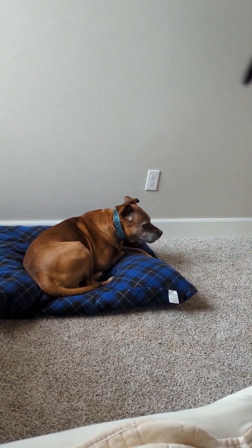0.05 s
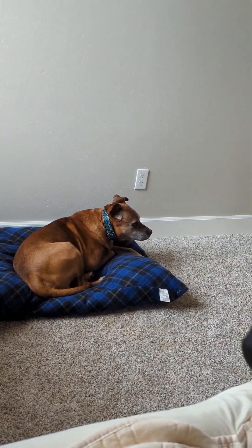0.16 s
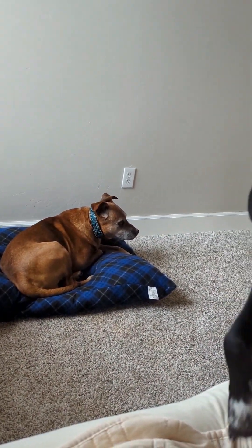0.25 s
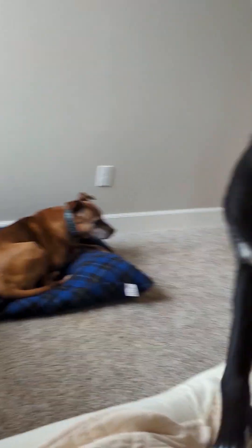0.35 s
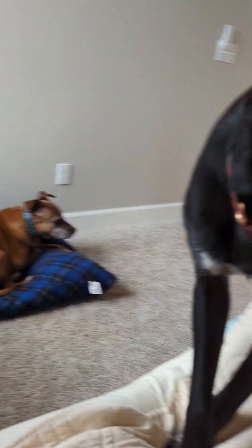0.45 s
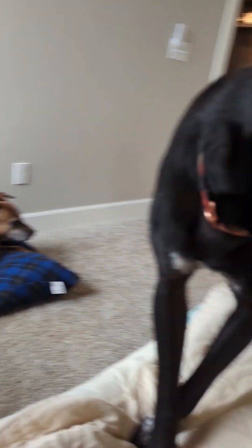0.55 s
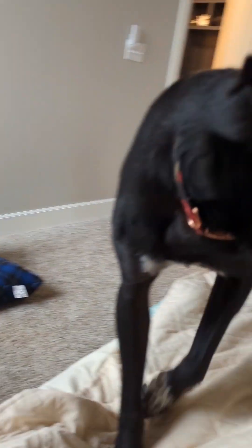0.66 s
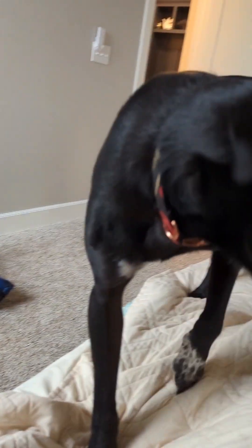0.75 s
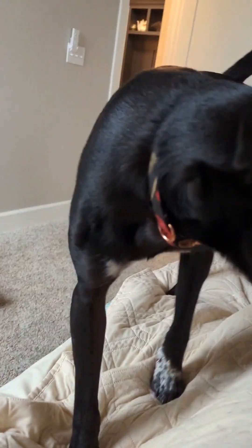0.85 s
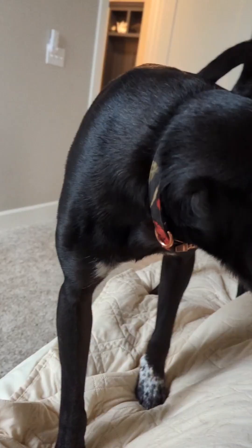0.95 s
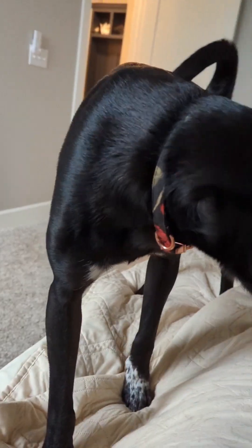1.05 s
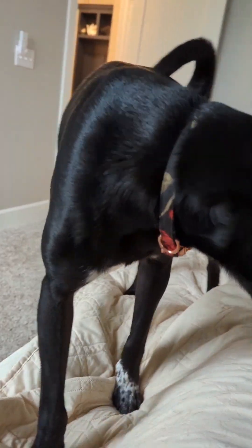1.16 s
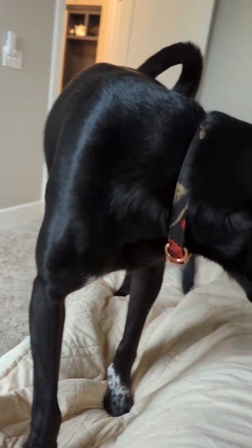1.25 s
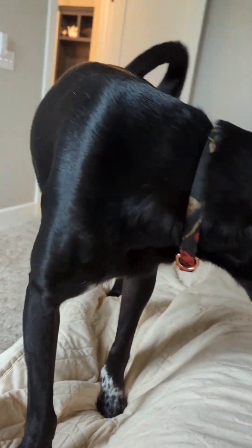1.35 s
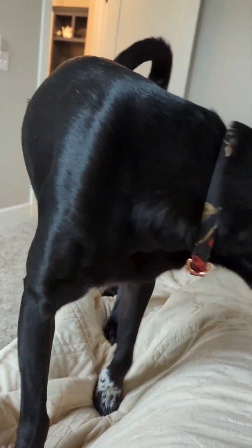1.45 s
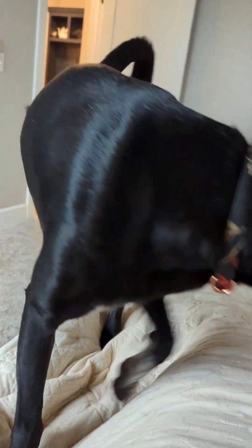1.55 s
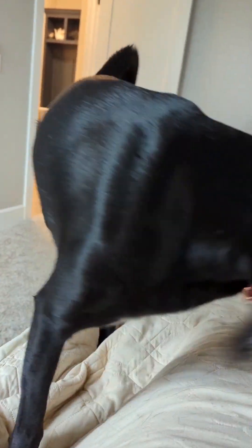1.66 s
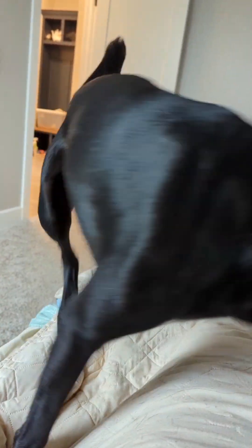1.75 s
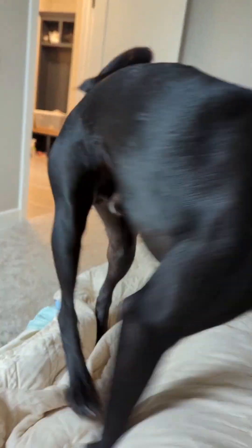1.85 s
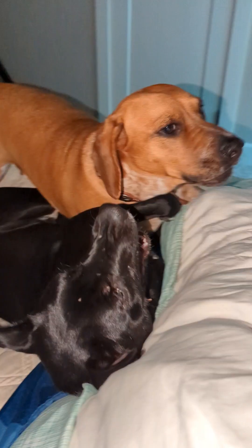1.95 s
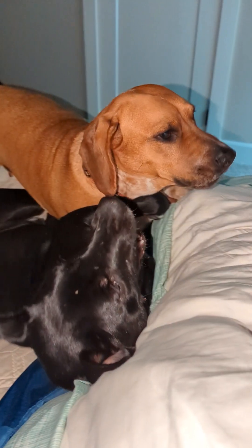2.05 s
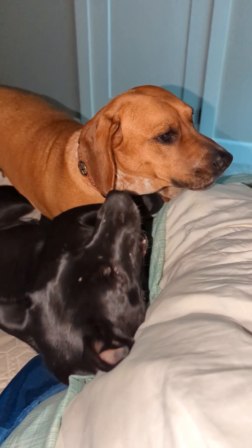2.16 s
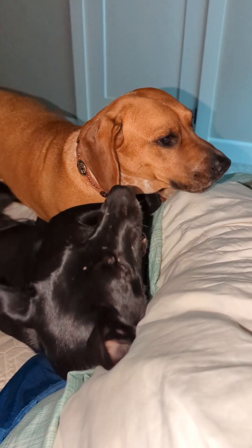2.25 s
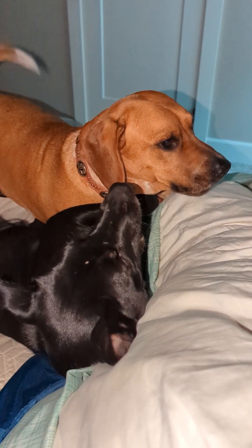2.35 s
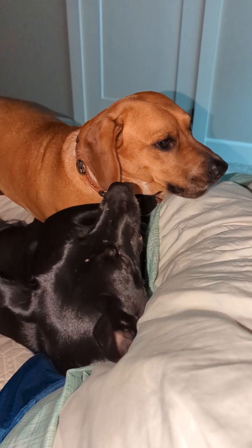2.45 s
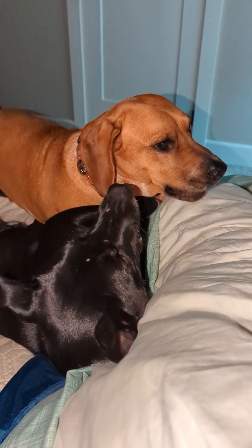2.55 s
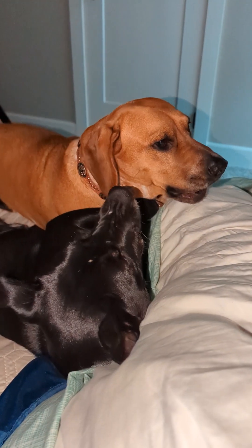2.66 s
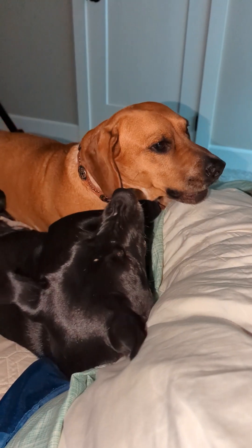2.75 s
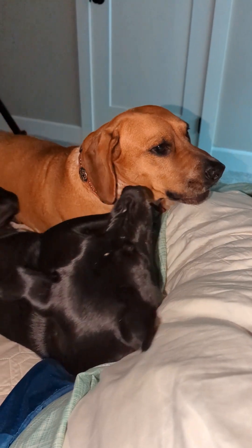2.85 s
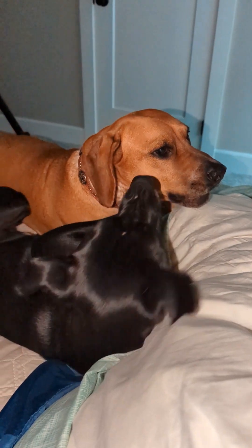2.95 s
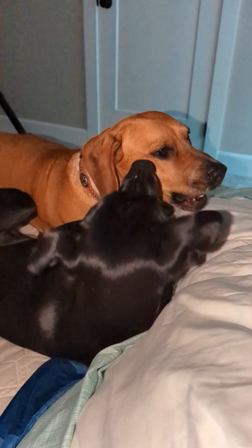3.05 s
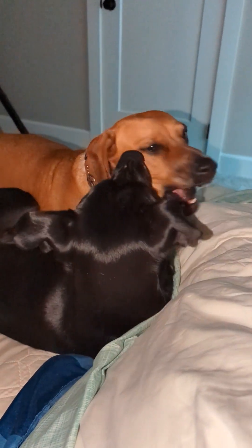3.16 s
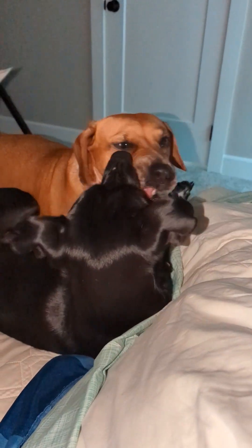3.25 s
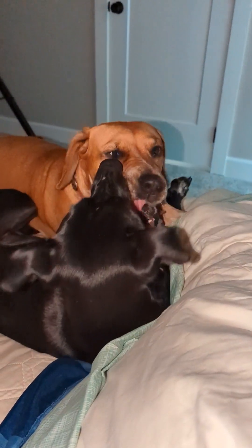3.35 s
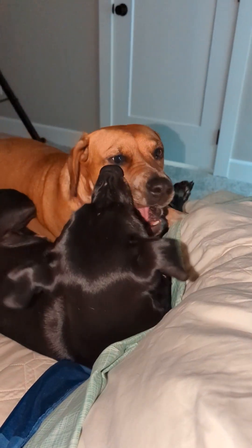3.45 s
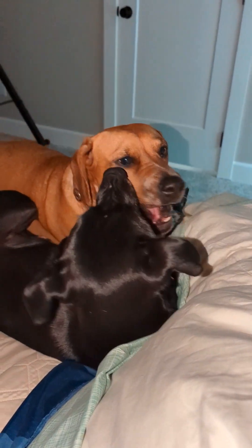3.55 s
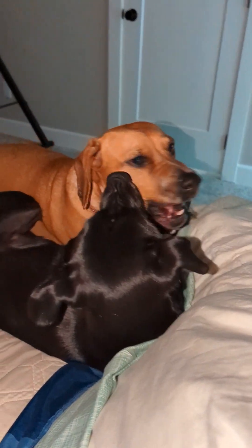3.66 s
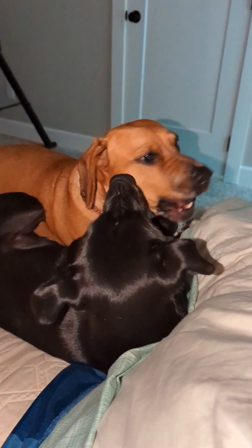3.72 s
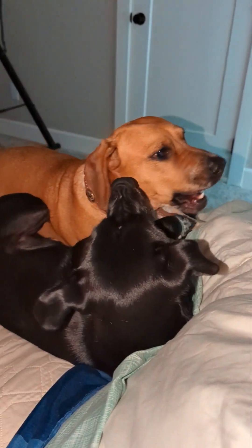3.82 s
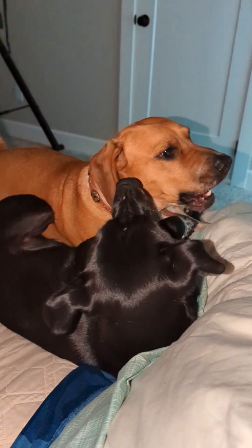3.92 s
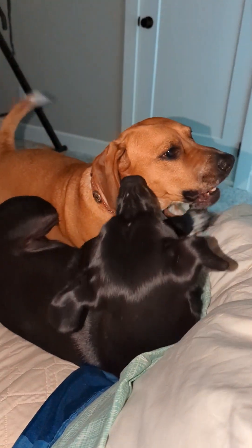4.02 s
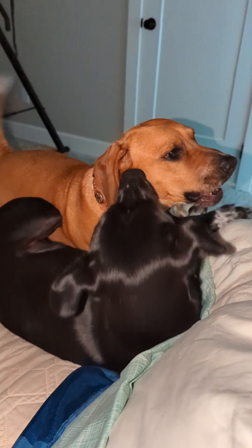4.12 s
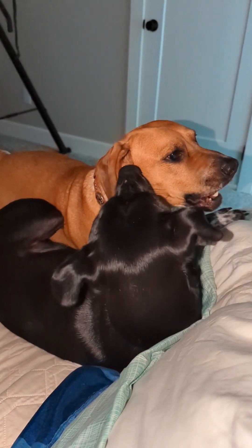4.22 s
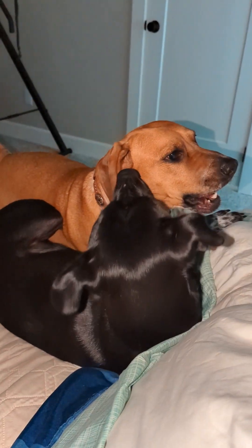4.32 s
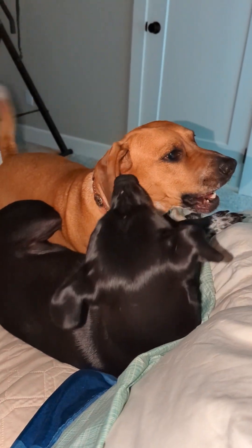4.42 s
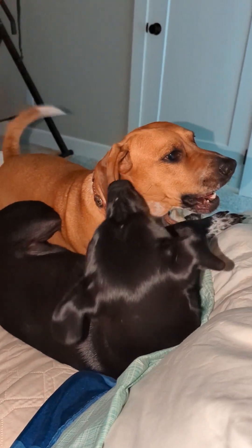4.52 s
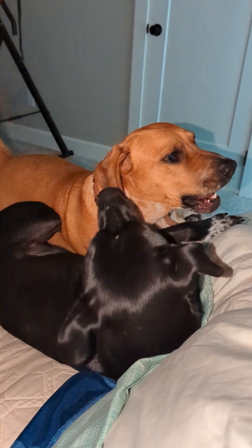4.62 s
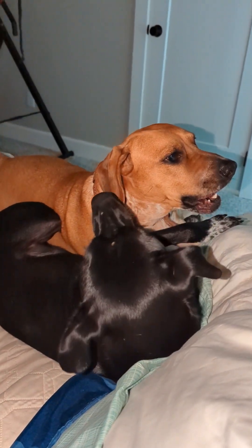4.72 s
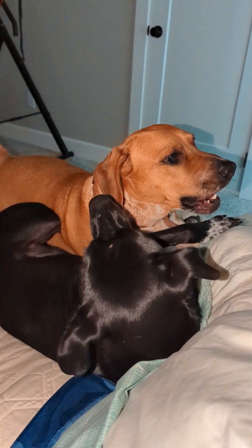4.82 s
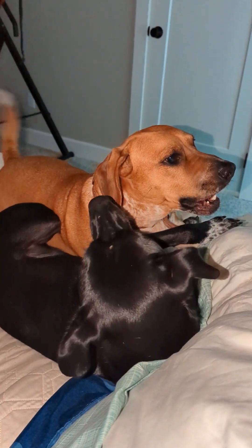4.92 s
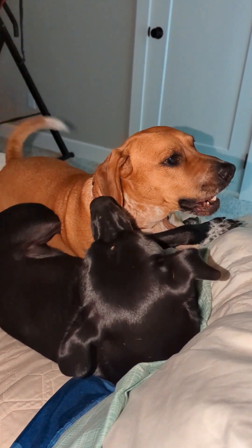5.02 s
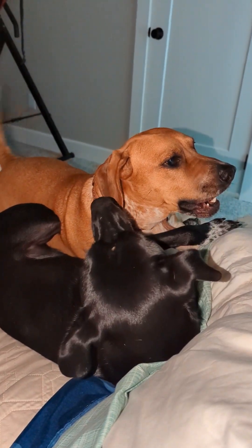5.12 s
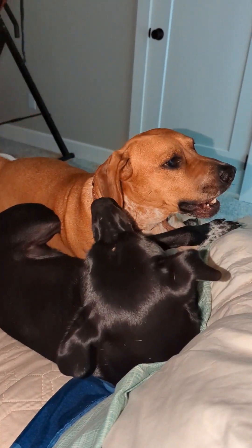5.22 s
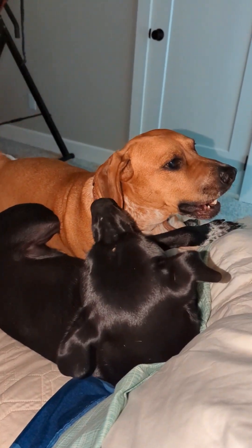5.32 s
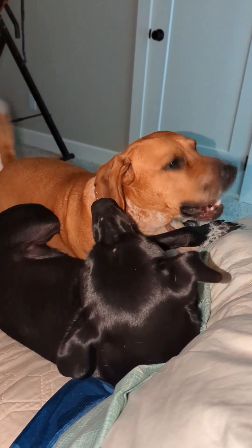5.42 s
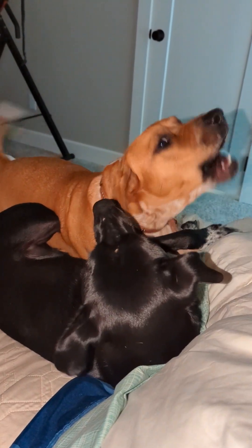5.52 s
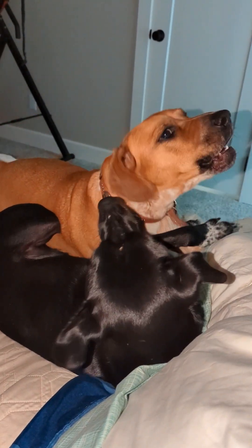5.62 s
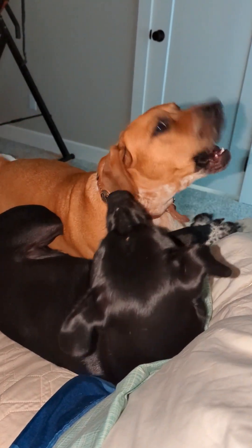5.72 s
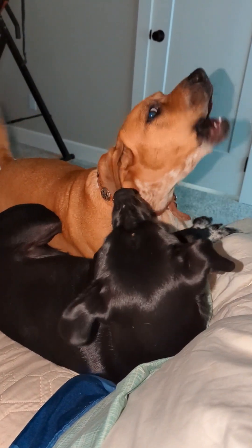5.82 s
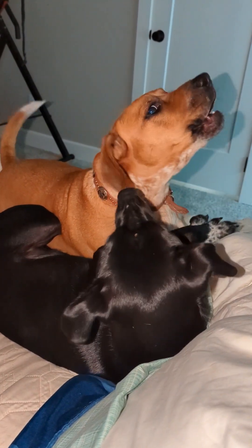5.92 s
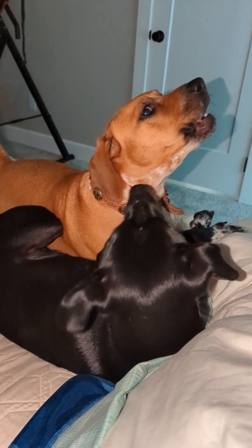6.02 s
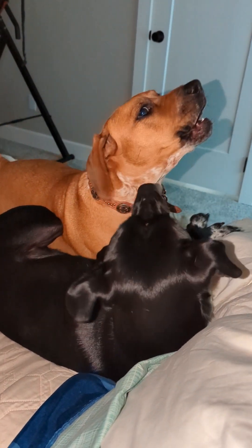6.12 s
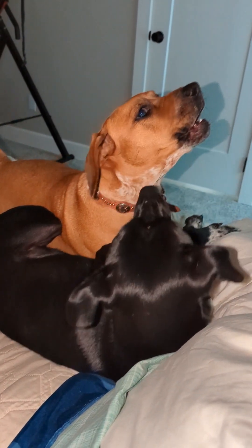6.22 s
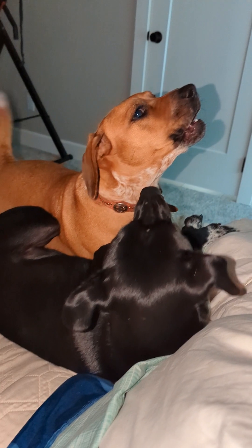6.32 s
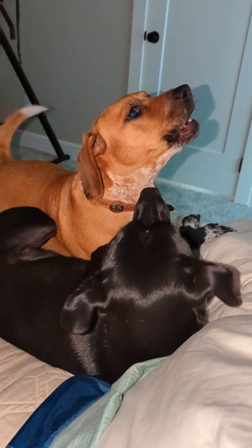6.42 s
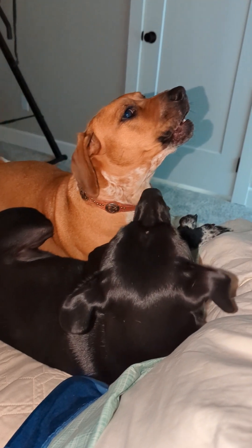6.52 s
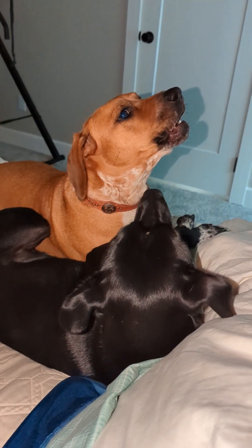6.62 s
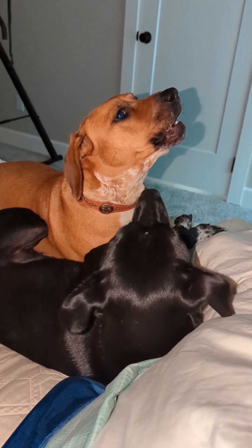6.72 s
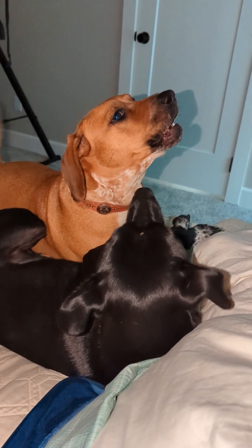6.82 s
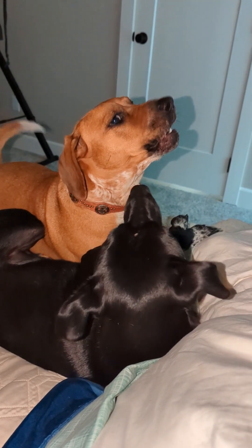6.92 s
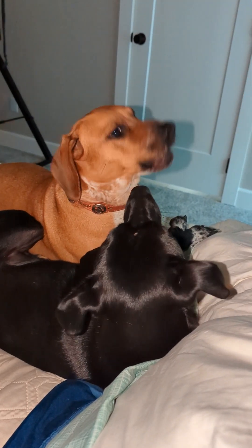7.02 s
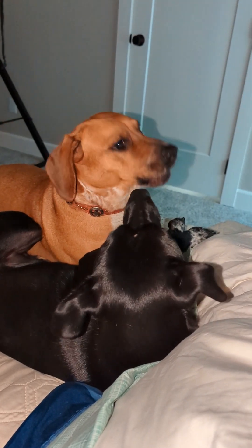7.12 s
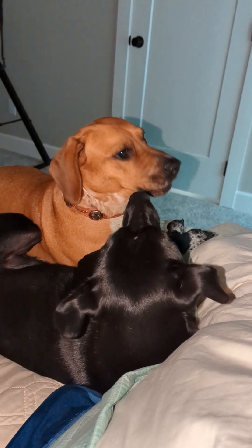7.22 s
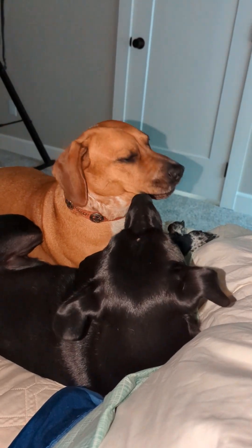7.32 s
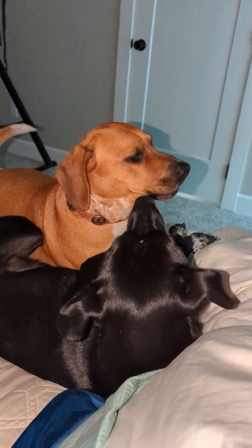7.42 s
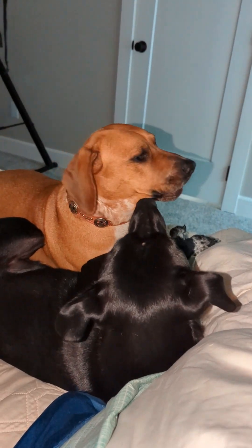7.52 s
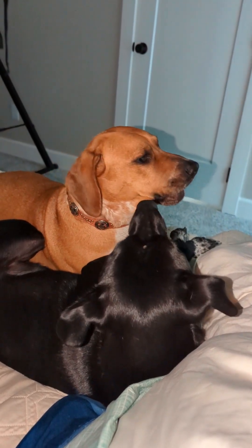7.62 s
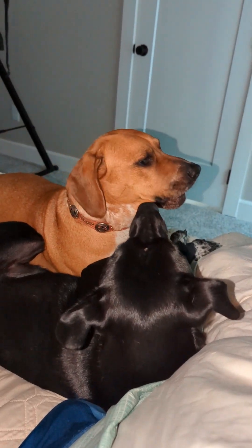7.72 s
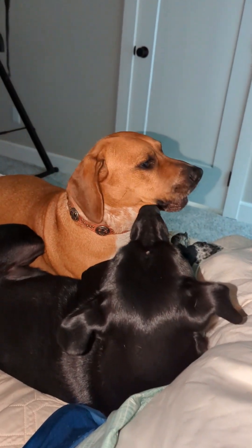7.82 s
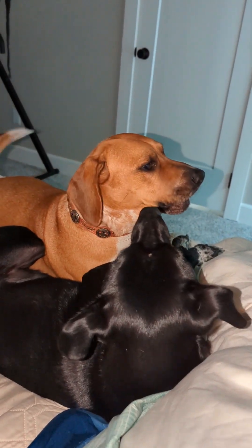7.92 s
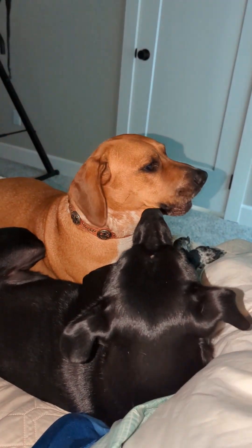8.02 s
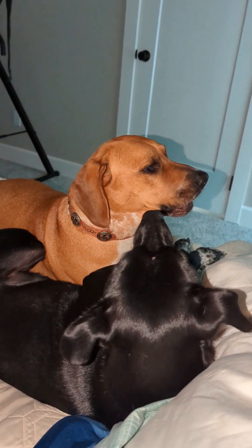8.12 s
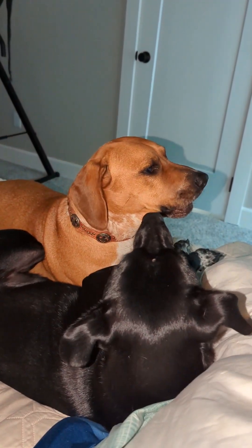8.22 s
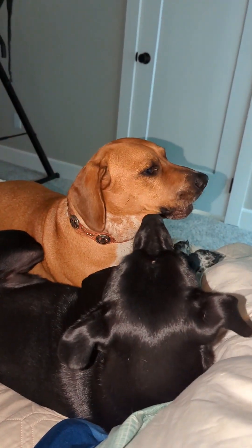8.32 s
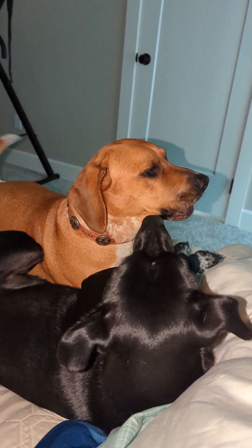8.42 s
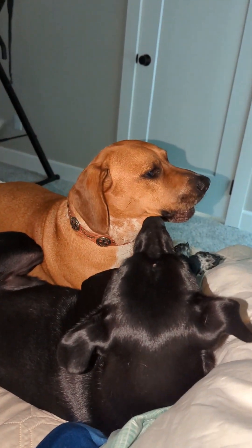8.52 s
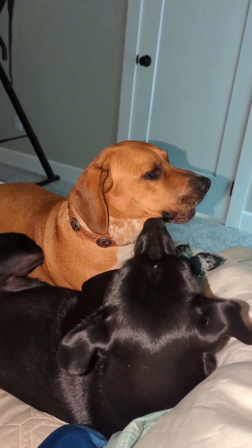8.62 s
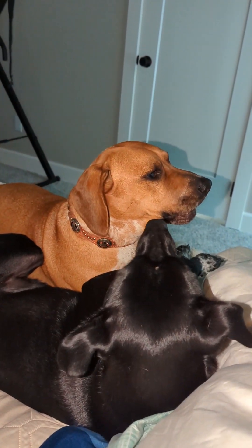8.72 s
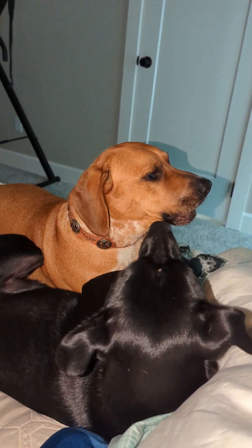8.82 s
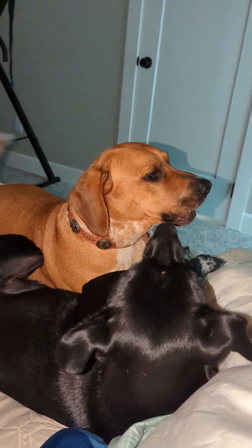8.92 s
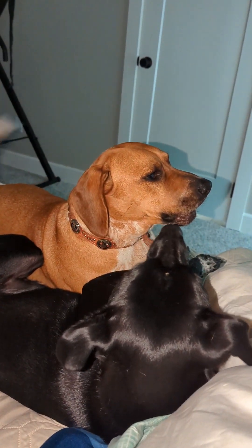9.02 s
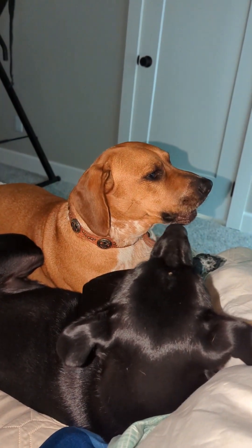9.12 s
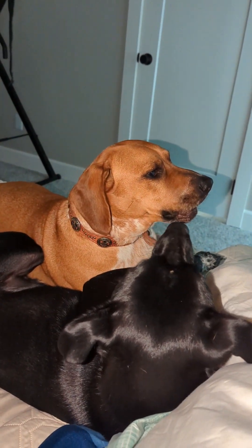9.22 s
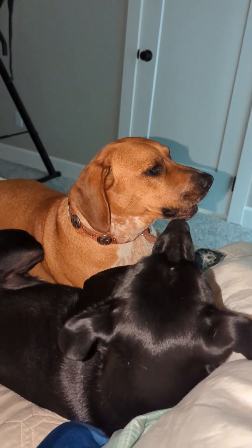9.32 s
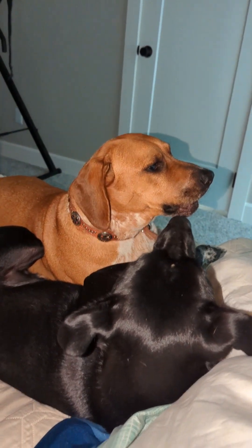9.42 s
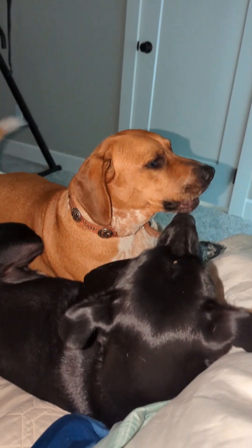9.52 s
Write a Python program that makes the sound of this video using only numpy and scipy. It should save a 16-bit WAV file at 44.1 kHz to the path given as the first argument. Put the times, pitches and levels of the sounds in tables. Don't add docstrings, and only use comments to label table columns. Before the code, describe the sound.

In a small carpeted room with a low hum, a dog's paws scuff and rustle over a quilt. After a tiny gap, a hound on a bed, close to a phone microphone, gives a hoarse howl that breaks upward and sags. It snores in air, moans lower, then bays loudly with two yelps, trailing off into creaks and two short muffled groans.

```python
import sys
import numpy as np
from scipy import signal
from scipy.fft import rfft, irfft, next_fast_len
from scipy.io import wavfile
from scipy.ndimage import uniform_filter1d, minimum_filter1d, map_coordinates

SR = 44100
rng = np.random.default_rng(int(sys.argv[2]) if len(sys.argv) > 2 else 0)


def dump(signal):
    limited = np.clip(np.atleast_2d(signal).T, -1, 1)
    pcm = np.round(limited * 32767).astype(np.int16)
    wavfile.write(sys.argv[1], SR, pcm)


def voltage_ratio(level):
    return 10 ** (np.asarray(level, float) / 20)


N = 422037
SHOT_END_S, NEXT_SHOT_S = 1.905, 1.942
OPEN, SHUT, WIDE, CLOSING, ROUND, GAPING, LOOSE = range(7)

# [f/Hz, width/Hz, level/dB]
OPEN_HISS = [(4070, 240, 10), (4235, 320, -5.5), (6270, 340, 10), (7250, 870, 1), (8460, 3700, -0.5),
             (12200, 2600, -3), (14060, 3100, -15.5)]


def evened(x):
    return x / np.sqrt(np.mean(x ** 2) + 1e-20)


def read(points, hz):
    f, value = np.transpose(points)
    return np.interp(np.log(hz + 1), np.log(f + 1), value)


def unroll(rows):
    s, *columns = np.transpose(rows)
    t = np.arange(s[0], s[-1], 1 / SR)
    return t, [np.interp(t, s, c) for c in columns]


def add(mix, s, sound):
    part = mix[round(s * SR):][:len(sound)]
    part += sound[:len(part)]


def steady(x, size=3500):
    return x / np.sqrt(abs(uniform_filter1d(x ** 2, size=size)) + 1e-20)


def drifting(shape, size):
    once = uniform_filter1d(rng.standard_normal(shape), size=size)
    return evened(uniform_filter1d(once, size=size))


def resonate(x, hz, width):
    turn = np.exp(2j * np.pi * np.cumsum(hz * np.ones(len(x))) / SR)
    r = np.exp(-np.pi * width / SR)
    return 2 * (turn * signal.lfilter([1 - r], [1, -r], x / turn + 1e-18)).real


def cavities(x, modes):
    size = next_fast_len(len(x) + 4096)
    hz = np.fft.rfftfreq(size, 1 / SR)
    gain = sum(voltage_ratio(db) / (1 + 1j * (hz - f) / w) ** 2 for f, w, db in modes)
    return irfft(rfft(x, size) * gain, size)[:len(x)]


def band(x, lo_hz, hi_hz):
    return signal.sosfilt(signal.butter(4, [lo_hz, hi_hz], "band", fs=SR, output="sos"), x)


def coloured(points, lo_hz, hi_hz, same, patchy_db):
    frames, hz = N // 128 + 5, np.fft.rfftfreq(512, 1 / SR)
    a, b, c, d, patches = rng.standard_normal((frames, 257, 5)).T
    patches = evened(uniform_filter1d(uniform_filter1d(patches, size=8, axis=0), size=12, axis=1))
    like = (same / (1 + (hz / 900) ** 2))[:, None]
    left = a + 1j * b
    z = np.array([left, like * left + np.sqrt(1 - like ** 2) * (c + 1j * d)])
    z *= voltage_ratio(read(points, hz)[:, None] + patchy_db * patches)
    power = abs(z) ** 2
    share = np.sqrt(power[:, (hz > lo_hz) & (hz < hi_hz)].sum() / power.sum())
    return evened(signal.istft(z, nperseg=512, noverlap=384)[1][:, :N]) / share


def air():
    # [t/s, level/dB]
    filter_open = [(0, -14), (1.9, -17.5), (2.3, 0), (2.42, -9), (2.55, 5.5), (6.6, 16), (6.85, 0.5),
                   (7.3, 1), (7.55, -6), (8.25, 9), (8.5, 1), (9.25, 10), (9.57, 2)]
    # [f/Hz, level/dB per Hz]
    hush_colour = [(30, -25), (250, -14), (600, -13.5), (760, -4), (900, -10.5), (3100, -19.5), (3500, -27),
                   (16000, -41.5)]
    t = np.arange(N) / SR
    open_db = np.interp(t, *np.transpose(filter_open))
    hum_db = -67 + 0.53 * open_db + 12 * (t < SHOT_END_S)
    hush_db = -69.5 + open_db
    hum = evened(cavities(rng.standard_normal(N), [(118, 15, 0), (70, 30, -12), (190, 40, -14)]))
    vent = evened(cavities(rng.standard_normal(N), [(765, 15, -1.0), (680, 40, -5), (590, 54, -8.5)]))
    vent *= t > SHOT_END_S
    hush = coloured(hush_colour, 300, 3000, same=.9, patchy_db=1.5)
    return voltage_ratio(hum_db) * hum + voltage_ratio(hush_db) * (hush + voltage_ratio(-3) * vent)


def paws():
    # [t/s, length/s, scuff level/dB, rustle level/dB, left minus right/dB]
    strokes = [(0.106, 0.14, -64, -63.5, 0), (0.433, 0.2, -73, -60.5, 1), (0.635, 0.085, -46, -45, 0.5),
               (0.766, 0.052, -62, -46, 3), (0.85, 0.2, -66.5, -57.5, 0), (1.204, 0.23, -63, -58.5, 0),
               (1.414, 0.031, -77, -58, 0), (1.504, 0.089, -51, -51, 0.5), (1.704, 0.24, -65.5, -58.5, 1),
               (1.766, 0.037, -58, -53, 0), (1.874, 0.064, -43.5, -41, 0.5)]
    # [f/Hz, level/dB per Hz]
    cloth_colour = [(40, -19), (70, -7), (360, -4), (700, -7.5), (1300, -11), (5000, -20.5), (16000, -17)]
    t = np.arange(0, SHOT_END_S, 1 / SR)
    s, length, scuff_db, fine_db, pan_db = np.transpose(strokes)[:, :, None]
    side = np.array([.5, -.5])[:, None, None]
    stroke_db = -22 * abs(t - s) / length + side * pan_db
    cloth = coloured(cloth_colour, 250, 3000, same=.8, patchy_db=1.5)[:, :len(t)]
    dull = signal.sosfilt(signal.butter(2, 3000, fs=SR, output="sos"), cloth)
    rustle = evened(cloth - dull)
    out = voltage_ratio(scuff_db + stroke_db).sum(axis=1) * dull + voltage_ratio(fine_db + stroke_db).sum(axis=1) * rustle
    return np.pad(out, ((0, 0), (0, N - len(t))))


def tick(s, peak_db, hz):
    t = np.arange(1400) / SR
    snap = evened(cavities(rng.standard_normal(len(t)), [(hz, 2500, 0)]))
    envelope = voltage_ratio(peak_db - 60 * t / .03) * (1 - np.exp(-t / .0008))
    return s, envelope * (.45 * np.sin(2 * np.pi * hz * t) + .45 * snap)


def groan(mouth, start, creak, hold, effort_db, hz):
    start_db, creak_db, creak_hz = -21, -8, 90
    s = start + np.cumsum([0, .6 * creak, .4 * creak, hold, min(0.14, creak + hold + 0.03)])
    level_db = effort_db + np.cumsum([start_db, creak_db - start_db, -creak_db, -7.5 * hold, -28])
    slack = hz if mouth == OPEN else creak_hz
    pitch = [slack, 1.05 * slack, hz, hz * (1 - 0.4 * hold), creak_hz]
    throat_hz = 523 if mouth == OPEN else 595
    throat_hz = throat_hz * (1 + 0.059 * np.array([1.5, -0.5, 0.46, -0.7, 1.5]))
    return np.transpose([s, level_db, pitch, throat_hz, 0 * s]), mouth


def folds(t, hz, strain, mouth):
    rough = np.array([.31, .36, .48, .35, .32, .36, .25])[mouth]
    rough_strain = [-.1, 0, .25, 0, 0, .1, 0][mouth]
    rough = np.clip(rough + rough_strain * strain, 0, 1) * np.clip(hz / 180, 0, 1)
    waver = drifting((2, len(t)), 450)
    turns = np.cumsum(hz) / SR + .05 * waver[1]
    at = np.flatnonzero(np.diff(np.maximum.accumulate(np.floor(turns))))
    stray, size = rng.standard_normal((len(at), 2)).T
    late = .13 * rough[at] * stray * SR / hz[at]
    pulses = np.zeros(len(t))
    np.add.at(pulses, np.clip(at + late, 0, len(t) - 1).astype(int), np.exp(.7 * rough[at] * size))
    opening = signal.lfilter([1], [1, -.985], pulses)
    puffs = evened((.8 + evened(opening)) * rng.standard_normal(len(t)))
    drive = (1 - rough) * steady(pulses) + .55 * rough * puffs
    return drive, puffs, turns, waver[0]


def catches(t, effort_db):
    # [t/s, peak level/dB]
    catch_peaks = [(2.652, -7.5), (2.78, 4), (2.842, -1), (2.977, -9), (3.058, -6), (3.115, -3),
                   (3.151, -4), (3.237, -8), (3.269, -6.5), (3.311, -7), (3.355, -7.5), (3.459, -7.5),
                   (3.489, -19), (3.512, -13), (3.653, -20), (3.678, -19), (3.932, -27), (4.061, -16.5),
                   (4.172, -12), (4.209, -16.5), (4.262, -16), (4.309, -12), (4.433, -16.5), (4.577, -16.5),
                   (4.612, -16), (4.647, -17.5), (4.914, -15.5), (4.963, -23), (5.002, -21), (5.44, -4),
                   (5.7, 2.5), (5.761, -9), (5.819, -2.5), (5.895, -2), (6.036, -1), (6.077, -3),
                   (6.122, -8), (6.144, -5.5), (6.203, -9), (6.256, -13), (6.353, -22), (6.396, -19),
                   (7.008, -21), (7.588, -25), (7.624, -19), (7.646, -21), (7.675, -20.5), (7.712, -20.5),
                   (7.743, -15), (7.884, -23.5), (8.54, -27), (8.568, -21), (8.601, -22), (8.671, -19.5),
                   (8.697, -15), (8.739, -18), (8.78, -18), (8.808, -24), (9.022, -17), (9.071, -22)]
    rise_s, fall_s, crest_db, between_db = .002, .02, 4, -3.5
    s, peak_db = np.transpose(catch_peaks)[:, :, None]
    lift_db = np.clip(peak_db - crest_db - np.interp(s, t, effort_db), 1.5, 7) - between_db
    u = np.maximum(t[::16] - s, 0)
    swell = 1.3 * lift_db * (1 - np.exp(-u / rise_s)) * np.exp(-u / fall_s)
    return between_db + np.interp(t, t[::16], swell.max(0))


def throat_voice(t, drive, throat_hz, effort_db, strain, mouth):
    windpipe_db = [-9, -9, -9, -9, -12, -17, -9]
    ring = drive
    for width in 250, 330, 420:
        ring = resonate(ring, throat_hz, width)
    windpipe = steady(cavities(drive, [(530, 70, 0)]))
    both = band(steady(ring) + voltage_ratio(windpipe_db[mouth]) * windpipe, 400, 1300)
    ring = steady(both, size=900) * voltage_ratio(catches(t, effort_db))
    lumps = uniform_filter1d(rng.standard_normal(len(t)), size=round(.008 * SR))
    lumps = evened(uniform_filter1d(lumps, size=200))
    flutter_db = np.interp(effort_db, [-40, -10], [0, 2.2]) * np.tanh(lumps)
    return voltage_ratio(-9 * strain + flutter_db) * ring


def wander(x):
    drift_samples = 14 * drifting(len(x), 1500)
    return map_coordinates(x, [np.arange(len(x)) + drift_samples], order=3, mode="nearest")


def patchy(x, depth_db):
    z = signal.stft(x, nperseg=256, noverlap=192)[2]
    patches = rng.standard_normal(z.shape[::-1]).T
    patches = evened(uniform_filter1d(uniform_filter1d(patches, size=2, axis=0), size=70, axis=1))
    return evened(signal.istft(z * voltage_ratio(depth_db * patches), nperseg=256, noverlap=192)[1][:len(x)])


def nose_voice(drive, puffs, effort_db, strain, mouth):
    # [f/Hz, width/Hz, level/dB]
    nose_open = [(1053, 99, -5.5), (1425, 190, -8), (1710, 270, -10), (2700, 110, -19.5)]
    nose_shut = [(960, 150, -7), (1303, 300, -16.5), (1510, 172, -8.5), (1867, 66, 0), (2704, 250, -15.5)]
    nose_wide = [(975, 120, 5.5), (1420, 110, 5), (1900, 170, -4.5), (2350, 170, -11), (3050, 400, -27.5)]
    nose_closing = [(1000, 170, 2), (1554, 230, 1), (1825, 63, -5), (2740, 50, -6), (3190, 59, -8)]
    nose_round = [(1100, 200, -5.5), (1400, 250, -2.5), (1850, 130, -2), (2700, 120, -14)]
    nose_gaping = [(1025, 130, -1.5), (1405, 160, -4.5), (1960, 260, -1), (2320, 200, -6),
                   (2770, 250, -6.5), (3160, 300, -10.5)]
    nose_loose = [(950, 200, 3), (1800, 440, -7), (2723, 200, -11.5)]
    strain_db = [13.2, 12, 10, 12, 18, 12, 12]
    shapes = nose_open, nose_shut, nose_wide, nose_closing, nose_round, nose_gaping, nose_loose
    top_hz = {WIDE: 2800, CLOSING: 3500, GAPING: 3500}.get(mouth, 3000)
    nasal = cavities(drive + 0.66 * puffs, shapes[mouth])
    nasal = patchy(steady(band(wander(nasal), 850, top_hz)), depth_db=3.5)
    second_half = np.arange(len(drive)) > len(drive) / 2
    level_db = [-15, -11, -9.5, -13.5, -14, -15, 0][mouth] + strain_db[mouth] * strain
    return voltage_ratio(level_db + 0.33 * np.maximum(-30 - effort_db, 0) * second_half) * nasal


def mouth_hiss(t, puffs, strain, mouth):
    # [f/Hz, width/Hz, level/dB]
    hiss_shut = [(4320, 174, -0.5), (5580, 170, -6), (6410, 460, -10.5), (6910, 650, -10.5),
                 (9000, 490, -16.5), (13080, 540, -21), (13600, 2500, -19.5)]
    hiss_wide = [(4063, 150, 5), (4690, 300, -1), (5500, 530, -4), (6340, 1000, -7), (7400, 260, -10),
                 (8900, 1000, -13.5), (12600, 1300, -15.5)]
    hiss_closing = [(3760, 180, -0.5), (4200, 170, -2.5), (5940, 330, 0.5), (7230, 360, -5.5),
                    (8554, 900, -12), (12120, 1300, -12)]
    hiss_gaping = [(4197, 290, 4.5), (4900, 440, -8.5), (6600, 400, -6), (7460, 1100, -8),
                   (8760, 300, -14.5), (11790, 790, -15.5), (14300, 1200, -15)]
    hiss_loose = [(4330, 600, -1), (5630, 600, 1), (7100, 810, -2), (11140, 3000, -16)]
    shapes = OPEN_HISS, hiss_shut, hiss_wide, hiss_closing, hiss_closing, hiss_gaping, hiss_loose
    hiss = cavities(puffs, shapes[mouth])
    hiss = patchy(steady(band(wander(hiss), 3200 if mouth in (OPEN, ROUND) else 3800, 18000)), depth_db=4)
    level_db = [-29, -22.5, -26.5, -26, -30, -27.5, -14.5][mouth]
    level_db = level_db + [5.5, 0, 24, -0.5, -2, 17, 0][mouth] * strain
    return voltage_ratio(level_db) * hiss * (1 - np.exp(-((t - t[0]) / .04) ** 2))


def chest_voice(puffs, hz, strain):
    chest = steady(cavities(puffs, [(97, 34, -5.5), (190, 50, -11), (259.4, 68, -8.5)]))
    return voltage_ratio(-2 - 0.1178 * np.maximum(hz - 103.6, 0) - 29 * strain) * chest


def fold_tone(turns, waver, effort_db, hz, strain, mouth):
    mouth_db = [-0.5, 0, -4.5, -2, -1.5, -2.5, 3]
    tone_db = np.maximum(-3 - 0.1 * np.maximum(hz - 140, 0), -19.5)
    tone_db = np.minimum(effort_db + tone_db, -27.5) + mouth_db[mouth] - 31 * strain
    return np.sqrt(2) * voltage_ratio(tone_db - .5 + 2 * waver) * np.sin(2 * np.pi * turns)


def call(rows, mouth):
    t, (effort_db, hz, throat_hz, strain) = unroll(rows)
    drive, puffs, turns, waver = folds(t, hz, strain, mouth)
    hoarse = throat_voice(t, drive, throat_hz, effort_db, strain, mouth)
    hoarse += nose_voice(drive, puffs, effort_db, strain, mouth)
    hoarse += mouth_hiss(t, puffs, strain, mouth) + chest_voice(puffs, hz, strain)
    tone = fold_tone(turns, waver, effort_db, hz, strain, mouth)
    return t[0], (voltage_ratio(effort_db) * hoarse + tone) * signal.windows.tukey(len(t), 500 / len(t))


def slap(s, peak_db, thump_db):
    t = np.arange(2000) / SR
    ring = sum(a * np.sin(2 * np.pi * hz * t) for a, hz in [(1, 620), (.35, 950), (.2, 1850)])
    ring *= voltage_ratio(-60 * t / .018)
    thump = voltage_ratio(thump_db - 60 * t / 0.023) * np.sin(2 * np.pi * 130 * t)
    return s, voltage_ratio(peak_db) * (ring + thump) * (1 - np.exp(-t / 0.00073))


def yelp(rows, tilt_db, mouth):
    t, (hz, level_db) = unroll(rows)
    waver = drifting((2, len(t)), 200)
    turns = np.cumsum(hz * (1 + .025 * waver[0])) / SR
    k = np.arange(1, 14)[:, None]
    partial_db = read(mouth, k * hz) + tilt_db * (k - 1)
    note = (voltage_ratio(partial_db) * np.sin(2 * np.pi * k * turns)).sum(0)
    return t[0], np.sqrt(2) * voltage_ratio(level_db + 1.5 * waver[1]) * note * signal.windows.tukey(len(t), .15)


def snore(start, length, top_db, hz):
    # [f/Hz, width/Hz, level/dB]
    nostrils = [(1300, 450, -2), (1850, 250, 0), (2600, 300, -3)]
    t = np.arange(0, length, 1 / SR)
    flow_db = top_db + np.interp(t, [0, 0.055, length], [-14, 0, -16])
    buzz_db = np.interp(t, [0, 0.17], [-17.5, 2.5])
    turns = hz * t
    breath = (.5 + np.exp(-(turns % 1) / 0.29)) * rng.standard_normal(len(t))
    sound = evened(cavities(breath, nostrils))
    sound += voltage_ratio(-2.5) * evened(cavities(breath, [(700, 150, 1.2), (230.0, 18, 7.0)]))
    sound += voltage_ratio(-12.5 + 12 * t) * evened(cavities(breath, OPEN_HISS))
    sound += voltage_ratio(buzz_db) * np.sqrt(2) * np.sin(2 * np.pi * turns)
    return start, voltage_ratio(flow_db) * sound * signal.windows.tukey(len(t), .1)


def hound():
    # [t/s, effort/dB, pitch f/Hz, first throat resonance f/Hz, strain (1 = full)]
    howl = [(2.606, -40, 95.1, 580, 0.2), (2.64, -20, 104.1, 610, 0.09), (2.668, -11.5, 284, 595, 0.28),
            (2.76, -9, 301.6, 618, 0.31), (2.85, -14, 273.5, 602, 0.01), (2.957, -18.5, 249.4, 556, 0),
            (3.145, -8.5, 293, 670, 0.21)]
    howl_break = [(3.138, -5.5, 316.5, 700, 0.67), (3.19, -10, 448, 880, 0.83),
                  (3.255, -15, 417.7, 850, 0.09), (3.272, -7, 311.3, 870, 0.063),
                  (3.37, -11, 262.1, 890, 0.074), (3.42, -10.5, 280.3, 870, 0),
                  (3.47, -17, 248.6, 850, 0.056), (3.575, -21, 215.3, 868, 0.084),
                  (3.59, -30.5, 190, 830, 0.019)]
    moan = [(3.925, -31, 196.2, 604, 0.12), (3.953, -19.5, 234, 594, 0.2), (3.989, -16, 243.4, 606, 0.13),
            (4.349, -17.5, 238.6, 634, 0.17), (4.405, -18.5, 217, 627, 0.28),
            (4.535, -18.5, 216.8, 645, 0.18), (4.909, -21.5, 203.2, 610, 0.091),
            (5.013, -25.5, 170.9, 594, 0.25), (5.1, -53, 136.3, 680, 0.24)]
    bay = [(5.435, -8.5, 195.8, 647, 0.2), (5.493, -8.5, 265.2, 680, 0.98), (5.542, -13, 278.4, 960, 0.8),
           (5.63, -18, 278.2, 563, 0.61), (5.691, -6, 270.3, 560, 0), (5.78, -14.5, 267.2, 700, 1.3),
           (5.87, -18.5, 270.6, 720, 0.46), (6.11, -14, 286.9, 522, 0), (6.26, -30, 239.3, 590, 0.28)]
    bay_end = [(6.11, -22, 285, 680, 0.2), (6.24, -24, 243.7, 550, 0.06), (6.33, -22.5, 214, 574.6, 0.049),
               (6.4, -25.5, 194.2, 540, 0.046), (6.51, -30.5, 161.4, 505, 0.05),
               (6.57, -41.5, 138.8, 533, 0.05), (6.61, -58, 135.6, 548.7, 0.041)]
    # [t/s, creak/s, hold/s, effort/dB, pitch f/Hz]
    groans = [
        (1.932, 0.013, 0.17, -28.5, 196.3),
        (6.962, 0.06, 0.0059, -41, 90),
        (7.576, 0.112, 0.38, -27, 204.5),
        (8.536, 0.15, 0.39, -26, 205),
    ]
    groan_mouths = [0, 6, 1, 1]
    # [t/s, pitch f/Hz, level/dB]
    high_notes = [
        [(3.145, 334.2, -12.5), (3.16, 368, -15.5), (3.176, 397, -11.5), (3.184, 434, -12), (3.2, 459, -12),
         (3.218, 453, -11), (3.25, 429.7, -25.5)],
        [(5.462, 410, -16.5), (5.48, 512.4, -13), (5.5, 590, -8.5), (5.535, 641, -14.5)],
        [(5.505, 865, -14.5), (5.535, 937, -4.5), (5.553, 998, -7), (5.578, 900, -10)],
        [(5.572, 825, -9.5), (5.59, 700, -7), (5.612, 572, -7.5), (5.632, 539, -14.5)],
        [(5.74, 416.5, -7), (5.77, 567, -2.5), (5.795, 700, 0), (5.825, 708.6, -3)],
        [(5.815, 1000, -7.5), (5.845, 950, -4.5), (5.865, 903, -8.5)],
        [(5.87, 793, -7), (5.885, 700, -8), (5.9, 570, -12)],
        [(5.892, 576, -7), (5.905, 556, -9.5), (5.925, 539.6, -19), (5.96, 561.8, -9.5), (5.99, 522, -18)],
        [(5.665, 590, -18.5), (5.685, 590, -9.5), (5.696, 590, -18.5), (5.704, 587.5, -6), (5.745, 560, -11.5)],
    ]
    # [t/s, pitch f/Hz, level/dB]
    locked_howl = [(2.655, 590, -18), (2.667, 603.6, -9.5), (2.745, 645.5, -8.5), (2.759, 598.4, -10),
                   (2.79, 646, -9.5), (2.823, 614, -9), (2.83, 619, -24)]
    partial_tilts = [-1, -1, -8, -3, -3, -10, -4, -14, -14, -13]
    # [f/Hz, level/dB]
    yelp_mouth = [(330, -23.5), (570, 3), (800, -3), (1000, 1), (1500, 5), (1950, -8), (2500, -16),
                  (2900, -38)]
    break_mouth = [(330, -19.5), (450, -11.5), (800, 6), (1300, -7), (1600, -4.5), (1900, -4), (2400, -7.5),
                   (3300, -22.5)]
    # [t/s, length/s, airflow level/dB, palate buzz f/Hz]
    snores = [
        (3.591, 0.31, -32.5, 91.8),
        (5.071, 0.36, -39, 94.6),
    ]
    # [t/s, peak level/dB, thump against peak/dB]
    slaps = [(2.608, -19, -7), (2.62, -16, -2.5), (2.631, -12, -5), (2.641, -16, -3.5), (6.969, -29.5, -5),
             (7.033, -30, 0), (7.044, -32, 1.5), (8.648, -23, -17), (3.656, -18, 0.5), (3.679, -16.5, 4),
             (3.74, -34.5, -5.5), (3.802, -32, -6.5), (3.835, -28.5, 8), (5.179, -36, 8),
             (5.211, -27.5, 6.5), (5.244, -33, -4.5), (5.28, -36, -5), (5.313, -43, 8), (6.982, -30.5, 6.5),
             (7.008, -20.5, -3), (7.022, -20, -6.5), (7.587, -26.5, -20.5), (7.599, -20, -9),
             (7.623, -16.5, -2.5), (7.646, -16.5, -24), (8.541, -24, -2), (8.568, -20.5, -4.5),
             (8.58, -17, -3), (8.602, -26, 4), (8.614, -17.5, -0.5)]
    # [t/s, peak level/dB, f/Hz]
    ticks = [(1.141, -45, 6940), (3.143, -12, 2700), (6.748, -46, 950), (6.751, -45, 1706),
             (6.896, -42.5, 1018), (6.913, -37.5, 1060), (9.309, -56.5, 205.2), (9.368, -57, 203.4)]
    dog = np.zeros(N)
    calls = [(howl, ROUND), (howl_break, GAPING), (moan, OPEN), (bay, WIDE), (bay_end, CLOSING)]
    calls += [groan(mouth, *row) for mouth, row in zip(groan_mouths, groans)]
    for rows, mouth in calls:
        add(dog, *call(rows, mouth))
    for i, (rows, tilt_db) in enumerate(zip(high_notes + [locked_howl], partial_tilts)):
        add(dog, *yelp(rows, tilt_db, break_mouth if i == 0 else yelp_mouth))
    for source, table in (snore, snores), (slap, slaps), (tick, ticks):
        for row in table:
            add(dog, *source(*row))
    return signal.sosfilt(signal.butter(6, 75, "high", fs=SR, output="sos"), dog)


def ports(x):
    # [f/Hz, left minus right/dB]
    port_levels = [(60, 2), (130, -3.5), (290, 4), (640, 1.5), (1410, -1.5), (3100, -10.5), (6820, 0.5),
                   (15000, 4)]
    # [f/Hz, lead of the left port/rad]
    port_lead = [(0, 0), (1550, 0.77), (3010, 2.5), (3880, 8.5), (6800, 1.5), (7410, 7.5), (9650, 16.5),
                 (11200, 17), (12800, 23.5), (15800, 23.5)]
    size = next_fast_len(N + 4096)
    hz = np.fft.rfftfreq(size, 1 / SR)
    half = voltage_ratio(read(port_levels, hz) / 2) * np.exp(.5j * np.interp(hz, *np.transpose(port_lead)))
    return irfft(rfft(x, size) * np.array([half, 1 / half]), size)[:, :N]


def room(x):
    # [f/Hz, t60/s]
    decay_times = [(500, 0.38), (2000, 0.071), (8000, 0.21)]
    # [f/Hz, level/dB]
    wet_levels = [(100, -11), (300, -9), (600, -6.5), (2000, -2), (5000, 0), (12000, 1)]
    taps = np.zeros((2, SR // 2))
    at = np.arange(120, SR // 2 - 20, 20) + rng.integers(0, 20, (2, (SR // 2 - 121) // 20))
    np.put_along_axis(taps, at, rng.choice([-1., 1.], at.shape), 1)
    hz, t, z = signal.stft(taps, SR, nperseg=256)
    like = (1 / (1 + (hz / 700) ** 2))[:, None]
    z[1] = like * z[0] + np.sqrt(1 - like ** 2) * z[1]
    fade = voltage_ratio(-60 * t / read(decay_times, hz)[:, None])
    fade *= voltage_ratio(read(wet_levels, hz))[:, None] / np.linalg.norm(fade, axis=1, keepdims=True)
    tail = signal.istft(z * fade, SR, nperseg=256)[1] * np.sqrt(20 / 128)
    return signal.fftconvolve(x[None], tail, axes=1)[:, :N]


def scene():
    dog = hound()
    return voltage_ratio(0.5) * ports(dog) + room(dog) + paws() + air()


def band_limit(x):
    return signal.sosfilt(signal.butter(12, 15830, fs=SR, output="sos"), x)


def record(dry):
    t = np.arange(N) / SR
    gap = np.clip(np.maximum(SHOT_END_S - t, t - NEXT_SHOT_S) / 0.013, 0, 1)
    x = signal.sosfilt(signal.butter(2, 50, "high", fs=SR, output="sos"), dry) * gap
    x = signal.oaconvolve(x, signal.firwin(511, 16600, window=("kaiser", 9), fs=SR)[None], "same")
    peak_gain = np.minimum(.84 / (abs(x).max(0) + 1e-9), 1)
    mix = x * uniform_filter1d(minimum_filter1d(peak_gain, size=601), size=600)
    return band_limit(mix)


dry = scene()
out = record(dry)
dump(out)
```